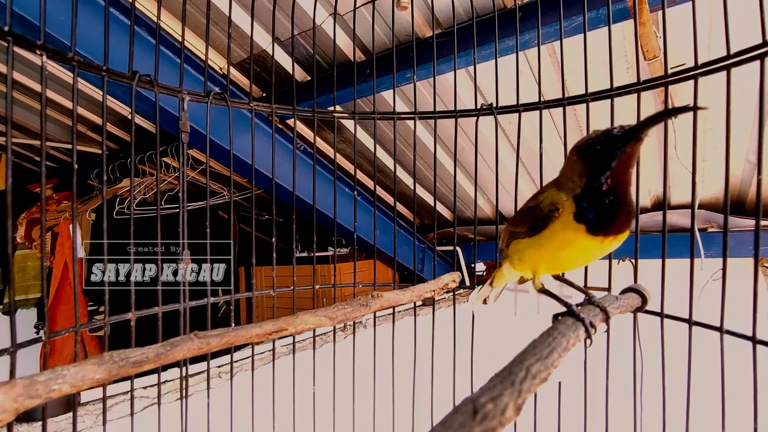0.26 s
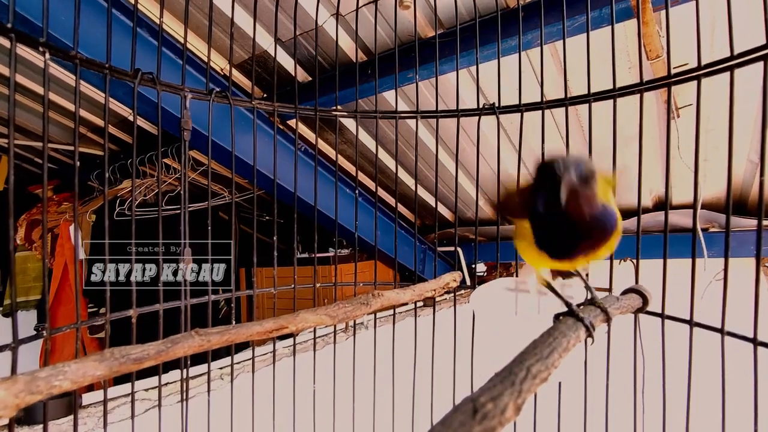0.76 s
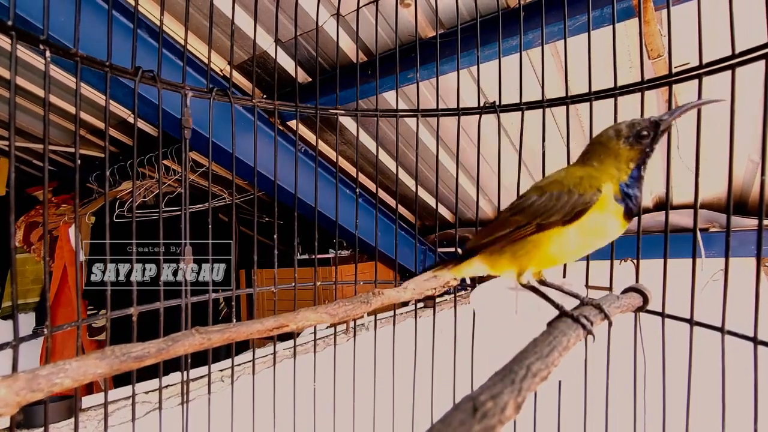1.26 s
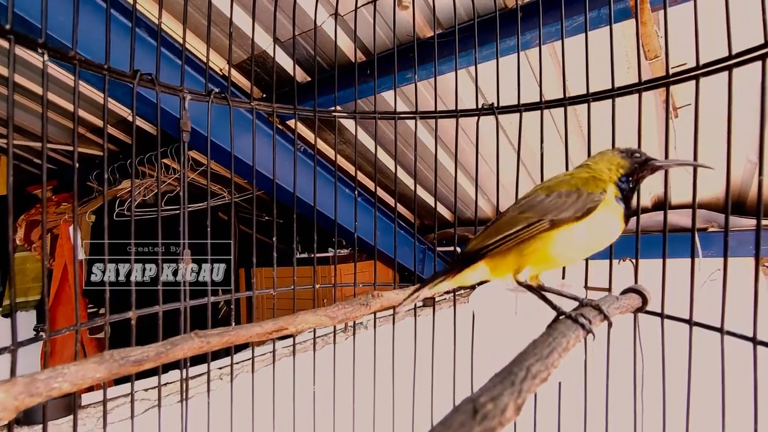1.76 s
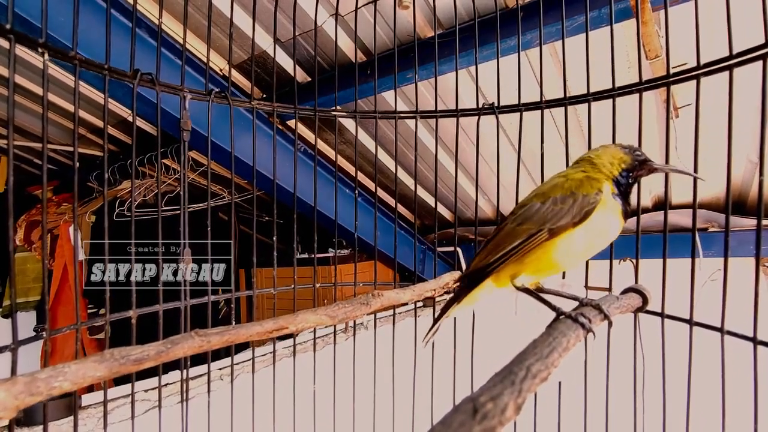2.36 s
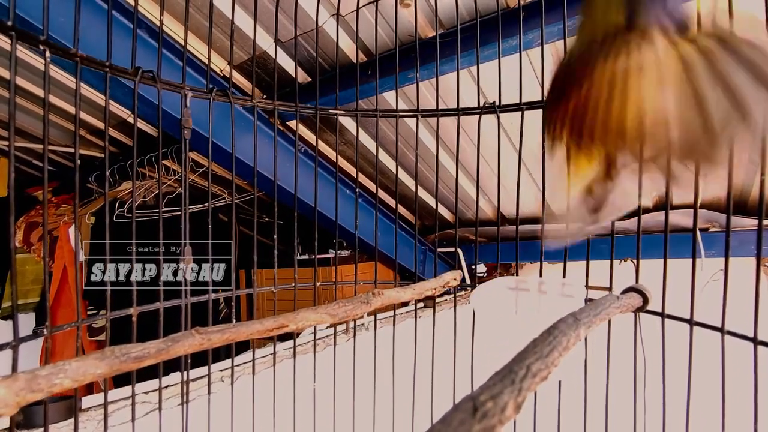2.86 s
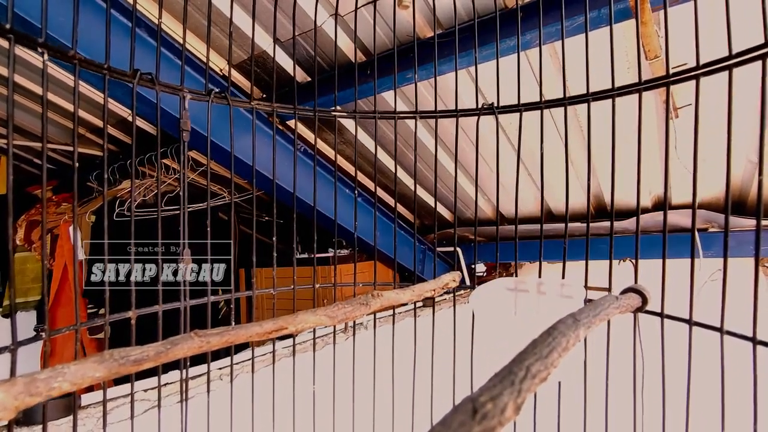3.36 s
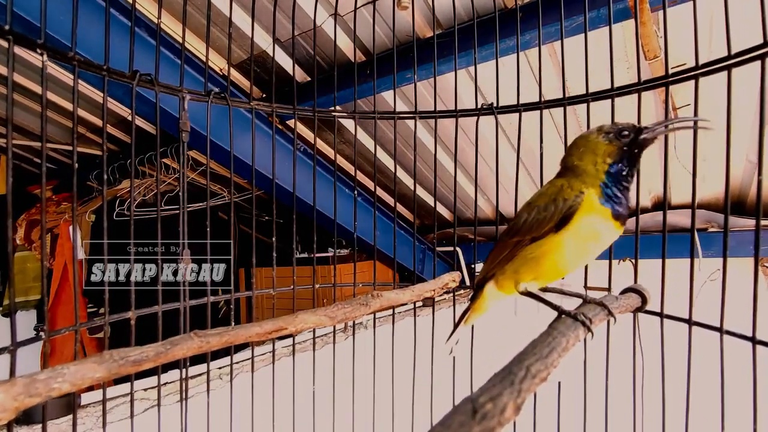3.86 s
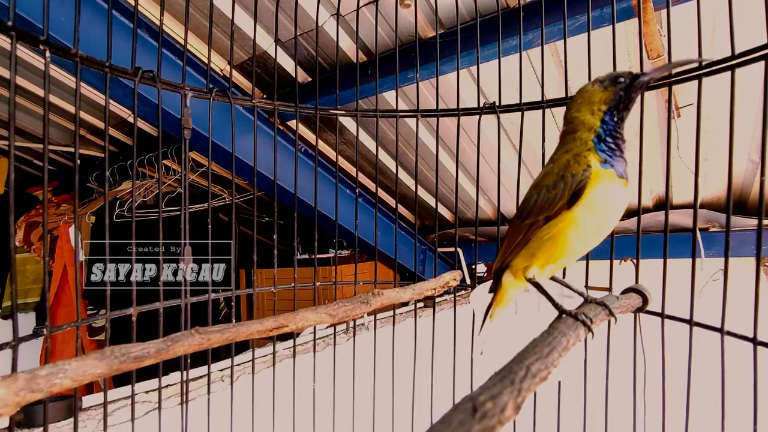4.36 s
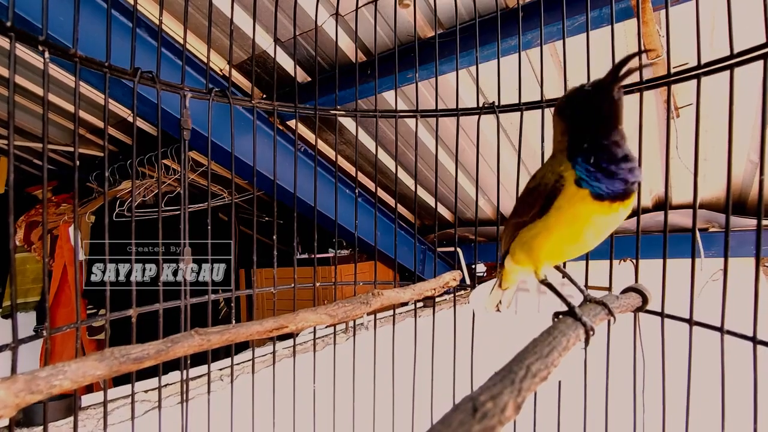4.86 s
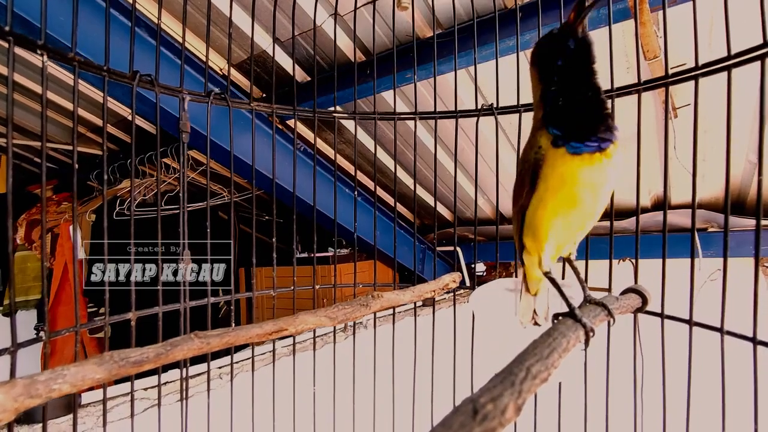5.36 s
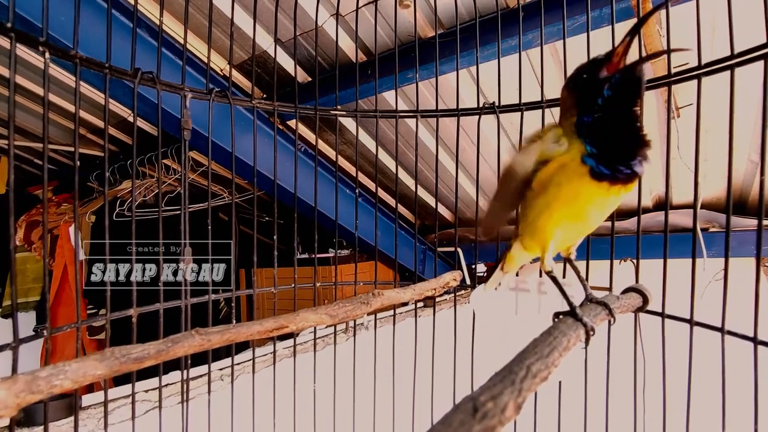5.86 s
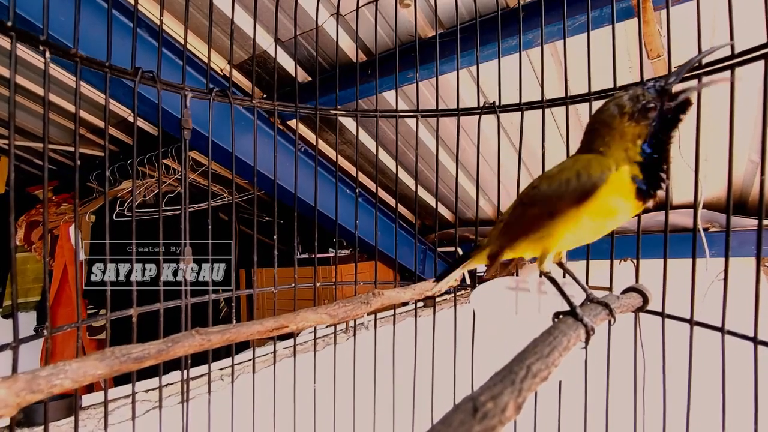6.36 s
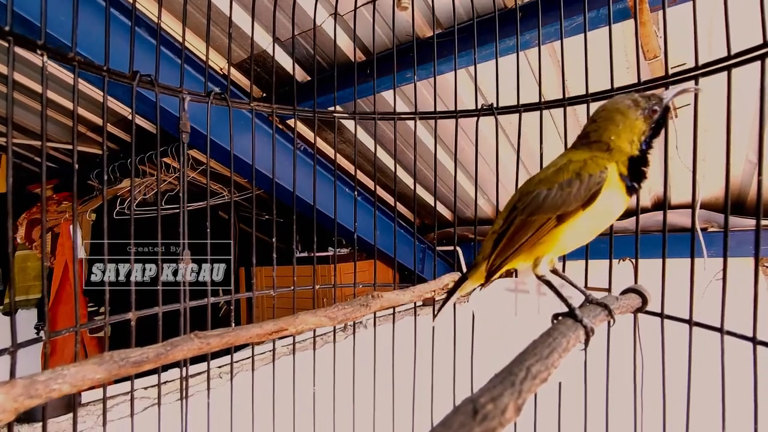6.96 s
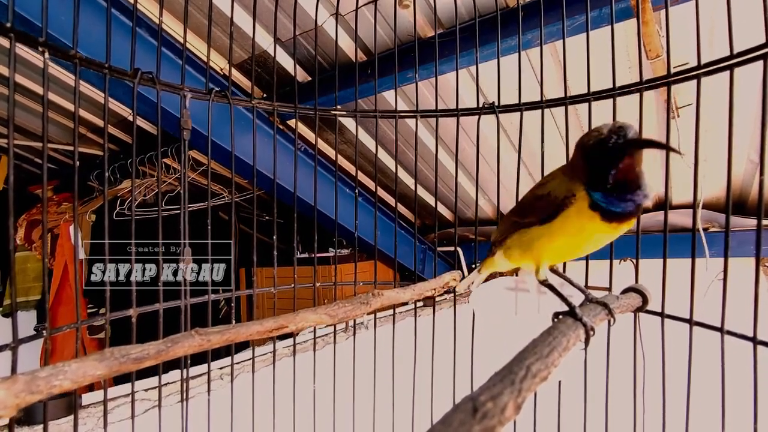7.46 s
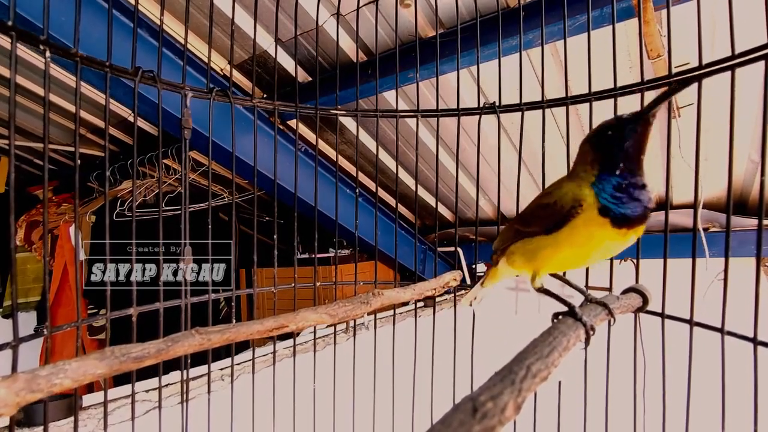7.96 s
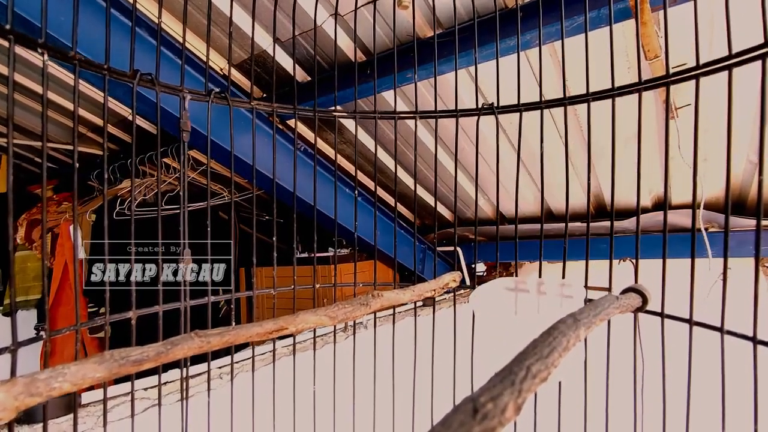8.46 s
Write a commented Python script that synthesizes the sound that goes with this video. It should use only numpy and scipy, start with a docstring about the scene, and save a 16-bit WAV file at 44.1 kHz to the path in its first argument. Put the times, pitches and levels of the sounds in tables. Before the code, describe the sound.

Quiet street rumble and faint hums under a metal roof. From 0 to 0.6 s a far bird repeats about six harsh, grainy calls with small upward slurs, then two faint whistles near 1 s. Tiny foot and feather rustles. At 2.2 s the background lifts and a low air puff hits the microphone, mostly right. The close caged bird gives a short chirp at 2.3 s, a rising call at 2.7, a hoarse bark at 3.0. From 3.4 to 5.6 s it pours out a fast, piercing run: quick sweeps, then seven high whistles slurring into lower raspy snarls, linked by jagged zigzags, with a short bright echo. A motor swells from 4.8 s, passes near 5.9 with road noise, sinks in pitch and fades by 7.2. At 7.35 s a heavy puff thumps right, a sharp chip follows at 7.4, a faint far call at 7.9, then quiet hum.

```python
"""Caged sunbird under a metal roof

A sunbird in a wire cage gives a few chirps and barks, a fast run of arched whistles, snarls and zigzags,
then a last chip: a harmonic buzz through a moving throat resonance, with echoes of filtered noise.
Shaped noise makes air puffs on the microphone, rustles and street noise; sums of sines make a passing
engine and faint hums. Another bird calls far off in noise bursts, sine slurs and whistles."""
import sys
import numpy as np
from scipy import signal
from scipy.fft import rfft, irfft, next_fast_len
from scipy.io import wavfile
from scipy.ndimage import uniform_filter1d, minimum_filter1d, map_coordinates

SR = 44100
rng = np.random.default_rng(int(sys.argv[2]) if len(sys.argv) > 2 else 0)


def dump(signal):
    """Clip the signal to [-1, 1] and save it as 16-bit WAV at the path in sys.argv[1]."""
    limited = np.clip(np.atleast_2d(signal).T, -1, 1)
    pcm = np.round(limited * 32767).astype(np.int16)
    wavfile.write(sys.argv[1], SR, pcm)


N = 384552
T = np.arange(N) / SR  # seconds
HZ = np.maximum(np.fft.rfftfreq(N, 1 / SR), 1)


def from_db(db):
    """Decibels to gain."""
    return 10 ** (np.asarray(db) / 20)


def rms_one(x):
    """Scale to unit power."""
    return x / np.sqrt(np.mean(x ** 2) + 1e-20)


def in_time(rows, t=T):
    """The columns of a curve at times t."""
    s, *columns = np.transpose(rows)
    return [np.interp(t, np.sort(s), column) for column in columns]


def at_hz(points, hz):
    """Read a spectrum on a log-frequency axis."""
    f, value = np.transpose(points)
    return np.interp(np.log(hz), np.log(f), value)


def coloured(x, points, unit=1):
    """Filter by a spectrum whose frequencies count in the given unit."""
    size = next_fast_len(x.shape[-1])
    hz = np.maximum(np.fft.rfftfreq(size, 1 / SR), 1)
    gain = from_db(at_hz(points, hz / unit))
    return irfft(rfft(x, size) * gain, size)[..., :x.shape[-1]]


def wander(rate, t=T):
    """Smooth chance with a spread near 1, renewed rate times a second."""
    knots = rng.standard_normal(4096)
    return np.interp((t - t[0]) * rate, np.arange(len(knots)), knots)


def swell(s, db, half, t=T):
    """A bell-shaped burst of level."""
    return from_db(db) * np.exp(-np.minimum(((t - s) / half) ** 2, 50) / 2)


def delayed(x, ms):
    """Read a signal a little later, or earlier if ms is negative."""
    return map_coordinates(x, [np.arange(N) - ms * SR / 1000], order=3, mode="nearest")


def panned(pair, points):
    """Share each frequency between the sides by its left-right dB."""
    ratio = from_db(at_hz(points, HZ))
    sides = np.array([ratio, np.ones_like(ratio)]) * np.sqrt(2 / (1 + ratio ** 2))
    return irfft(rfft(pair) * sides, N)


def echoes(x, t60, colour, gap_s):
    """Dense reflections that start after a gap and die away, different on each side."""
    t = np.arange(SR) / SR
    response = coloured(rng.standard_normal((2, len(t))), colour)
    response *= from_db(-60 * t / t60) * (t > gap_s)
    response /= np.sqrt(np.sum(response ** 2, axis=1, keepdims=True))
    return signal.fftconvolve(x[None], response, axes=1)[:, :N]


# How alike the two sides are. Each row: frequency in Hz, left-right correlation.
LIKENESS = [(50, 0.98), (300, 0.94), (700, 0.85), (1500, 0.2), (4000, 0.089), (12000, 0.036)]
STREET_LAG_MS = 0.38  # the left side hears the street later


def far_noise(spectrum):
    """Stereo noise from the street side: alike in the bass, diffuse in the treble."""
    mid, side = rfft(rng.standard_normal((2, N))) * from_db(at_hz(spectrum, HZ))
    alike = np.clip(at_hz(LIKENESS, HZ), 0, 1)
    mid, side = mid * np.sqrt(1 + alike), side * np.sqrt(1 - alike)
    lag = np.exp(-2j * np.pi * HZ * STREET_LAG_MS / 1000)
    return rms_one(irfft([(mid + side) * lag, mid - side], N))


SLUR_HZ, SLUR_RISE_HZ_PER_S, SLUR_HALF_S = 4200, 11000, 0.013


def far_slur(s, db, blur_hz=70, root_db=1):
    """A short upward slur of the far bird, with the octave below it."""
    from_middle = np.clip(T - s, -3 * SLUR_HALF_S, 3 * SLUR_HALF_S)
    hz = SLUR_HZ + SLUR_RISE_HZ_PER_S * from_middle + blur_hz * wander(400)
    root_phase = np.pi * np.cumsum(hz) / SR
    return swell(s, db, SLUR_HALF_S) * (from_db(root_db) * np.sin(root_phase) + np.sin(2 * root_phase))


# The far bird's harsh calls. Each row: start in seconds, level in dB.
FAR_CALLS = [(-.012, -49.5), (.103, -52), (.208, -51), (.318, -48), (.433, -47), (.540, -48),
             (7.925, -53.5)]
# Its upward slurs, around the onsets of harsh calls. Each row: middle in seconds, level in dB.
FAR_SLURS = [(.105, -65), (.21, -61), (.322, -58), (0.435, -60)]
# Its whistles. Each row: middle in seconds, level in dB, half length in seconds, pitch in Hz.
FAR_WHISTLES = [(1.003, -60.5, 0.022, 2900), (1.073, -59, .018, 2500)]
# Tone of the harsh calls. Each row: frequency in Hz, relative level in dB.
FAR_COLOUR = [(1700, -23), (2250, 10), (3100, 6), (3700, -17), (4300, -3.5), (5200, -20)]
# Tone of the far bird's echo and the sunbird's early echo. Each row: frequency in Hz, relative level in dB.
ROOM_COLOUR = [(1000, -2.5), (4000, 2), (6800, -4), (8500, 10), (12000, -1.5), (16000, 1.5)]
FAR_T60_S = 0.95


def far_bird(attack_s=0.013, release_s=0.036, echo_db=-7, grain_db=2, blur_hz=130, whistle_echo_db=1):
    """Grainy noise calls with a slow echo tail, and blurred sine slurs and whistles with echoes."""
    calls = 0
    for s, db in FAR_CALLS:
        age = np.maximum(T - s, 0)
        body = np.exp(-age / release_s) * from_db(grain_db * wander(200))
        tail = from_db(echo_db - 60 * age / FAR_T60_S)
        call = from_db(db) * np.minimum(age / attack_s, 1) * np.hypot(body, tail)
        calls = np.hypot(calls, call)
    tones = sum(far_slur(*row) for row in FAR_SLURS)
    for s, db, half, hz in FAR_WHISTLES:
        phase = 2 * np.pi * np.cumsum(hz + blur_hz * wander(660)) / SR
        tones = tones + swell(s, db, half) * np.sin(phase)
    echo = from_db(whistle_echo_db) * echoes(tones, FAR_T60_S, ROOM_COLOUR, gap_s=.02)
    return far_noise(FAR_COLOUR) * calls + tones + echo


# Passing engine. Each row: time in seconds, firings per second.
FIRING = [(0, 46), (4.6, 45.8), (5.1, 46.2), (5.55, 46.7), (5.85, 45.1), (6.3, 44.3), (7.3, 43.6),
          (8.72, 42.3)]
# Its loudness. Each row: time in seconds, level in dB.
ENGINE = [(0, -58), (2.1, -58), (2.3, -53.5), (4.0, -52), (4.8, -39.5), (5.4, -36.5), (5.8, -37.5),
          (6.2, -35.5), (6.7, -37.5), (7.2, -49.5), (8.72, -54.5)]
# Its balance coming and going. Each row: order as a multiple of the firing rate, relative level in dB.
ORDERS_AHEAD = [(1, -21), (2, -5), (3, -4.5), (4, 1.5), (5, 1), (6, -20), (7, -11.5), (8, -11.5), (9, -3),
                (10, -5.5)]
ORDERS_BEHIND = [(1, -26), (2, -15), (3, -14.5), (4, -3), (5, 1), (6, -4), (7, -2), (8, -7), (9, -9.5),
                 (10, -8)]
# The balance turns from coming to going: start in seconds, end in seconds.
TURN_S = (5.5, 5.9)


def engine(waver_db=2.5, unsteady=0.0048):
    """Exhaust orders sink in pitch and change their balance as the engine goes by."""
    (firing,), (level_db,) = in_time(FIRING), in_time(ENGINE)
    phase = 2 * np.pi * np.cumsum(firing * (1 + unsteady * wander(12))) / SR
    past, out = np.interp(T, TURN_S, (0, 1)), 0
    for k, (ahead, behind) in enumerate(zip(ORDERS_AHEAD, ORDERS_BEHIND), 1):
        order_db = ahead[1] + past * (behind[1] - ahead[1]) + waver_db * wander(6)
        out = out + from_db(order_db) * np.sin(k * phase + 2 * np.pi * rng.random())
    out = rms_one(out) * from_db(level_db)
    return np.array([delayed(out, STREET_LAG_MS), out])


# Faint hums and a thin whine. Each row: start in seconds, end in seconds, pitch in Hz, level in dB,
# spread of the pitch in Hz.
HUMS = [(0, 2.2, 183, -59.5, 3.7), (0, 2.2, 332.8, -60, 3), (0, 3.8, 114, -59, 4),
        (2.2, 3.3, 355.5, -58, 1.5), (2.4, 4.2, 414.5, -55, .8), (2.2, 8.5, 94, -56, 8),
        (5.3, 5.75, 91, -47, 3), (7.5, 8.5, 99.5, -52, 1.16), (0, 2.15, 12950, -74, 60)]


def hums(fade_s=0.086, waver_db=2.5):
    """Narrow tones that waver in pitch and level, and come and go."""
    out = 0
    for start, end, hz, db, width in HUMS:
        gate = np.clip(np.minimum(T - start, end - T) / fade_s + .5, 0, 1)
        level = from_db(db + waver_db * wander(7)) * np.sqrt(2)
        phase = 2 * np.pi * np.cumsum(hz + width * wander(4 * width)) / SR
        out = out + gate * level * np.sin(phase)
    return out


# the traffic is nearest at this moment, and this long on its way in and out
NEAREST_S, APPROACH_S, RECEDE_S = 5.917, 0.84, 0.73
# the background jumps up at one moment and settles again; it also starts a little raised
SURGE_S, SURGE_SETTLE_S, OPENING_SETTLE_S = 2.155, 0.61, 0.38


def street_level(before_db, after_db, nearest_db, loss_db, surge_db, opening_db):
    """Gain of one street layer: a steady bed, the passing traffic and two swells that settle."""
    distance = np.hypot(1, (T - NEAREST_S) / np.where(T < NEAREST_S, APPROACH_S, RECEDE_S))
    passing = from_db(nearest_db - loss_db * np.log10(distance))
    bed = from_db(np.where(T < SURGE_S, before_db, after_db))
    surge = from_db(surge_db) * (T > SURGE_S) * np.exp(-np.abs(T - SURGE_S) / SURGE_SETTLE_S)
    opening = from_db(opening_db) * np.exp(-T / OPENING_SETTLE_S)
    return np.sqrt(bed ** 2 + passing ** 2 + surge ** 2 + opening ** 2)


# Rumble, road noise and hiss, in that order. Each row: steady level in dB before the surge, steady level
# in dB after it, level in dB at the nearest, loss in dB per tenfold distance, surge in dB, opening in dB.
STREET = [(-53.5, -51, -40, 26.5, -43, -47.5), (-62.5, -58, -37.5, 41.5, -46, -53),
          (-65, -66, -47.5, 49.5, -52, -60)]
# Tones of the three layers. Each row: frequency in Hz, relative level in dB.
RUMBLE = [(20, -32), (50, -25.5), (90, 0), (170, -0.5), (330, -1.5), (480, -5), (700, -6.5), (1100, -35),
          (12000, -36.5), (16000, -51.5)]
ROAD = [(400, -34.5), (750, -1), (1100, -1), (1700, -5), (2600, -12.5), (4000, -16.5), (6000, -30),
        (16000, -51)]
HISS = [(1800, -18), (3500, 2), (5500, -2), (7400, -6.5), (9100, 3.5), (10500, -10.5), (12000, 1),
        (14000, -15.5), (16000, -17.5)]
# Diffuse treble wash of the song's echo swells during the run: middle in seconds, level in dB, half length
# in seconds.
ECHO_WASH = (4.3, -48.5, .45)
# Ticks and rustles of feet and feathers. Each row: middle in seconds, level in dB, half length in seconds.
RUSTLES = [(0.232, -53, 0.019), (0.657, -58.5, 0.034), (1.698, -55.5, 0.021), (1.782, -58.5, 0.079),
           (2.21, -60.5, 0.031), (2.42, -56, 0.056), (3.037, -41, 0.0018), (6.716, -48.5, 0.011),
           (7.305, -49, 0.014), (7.329, -46.5, 0.0034), (7.344, -48, 0.0017), (7.606, -52, 0.03),
           (7.985, -57.5, 0.023)]
# Tone of the rustles. Each row: frequency in Hz, relative level in dB.
RUSTLE_COLOUR = [(800, 0.5), (2500, -6), (5000, -9), (7500, -10.5), (9200, -2), (12000, -6), (16000, -23.5)]
# Stereo balance of all these layers. Each row: frequency in Hz, left-right balance in dB.
STREET_PAN = [(100, 1), (2400, -1), (4400, -1.5), (8500, -12.5), (12000, 5.5), (15000, 1)]


def surroundings(waver_db=1):
    """Filtered noise for the street, the diffuse treble wash of the song's echo and rustles in the cage."""
    out = swell(*ECHO_WASH) * far_noise(HISS)  # the wash shares the tone of the street's treble
    for row, colour in zip(STREET, (RUMBLE, ROAD, HISS)):
        level = street_level(*row) * from_db(waver_db * wander(14))
        out += level * far_noise(colour)
    out += far_noise(RUSTLE_COLOUR) * sum(swell(*row) for row in RUSTLES)
    return panned(out, STREET_PAN)


# Puffs of air on the microphone. Each row: middle in seconds, level in dB on the right, half length in
# seconds, left-right balance in dB, pitch as a multiple of the usual colour.
PUFFS = [(2.24, -33, 0.026, -2, .8), (2.265, -15, 0.0041, -32, 1.1), (2.287, -25.5, 0.028, -17, .85),
         (7.345, -5.5, 0.0053, -38, 1.15), (7.349, -23.5, 0.022, -12, 1), (7.401, -34, 0.0028, -10, 1.1)]
# Tone of a puff. Each row: frequency in Hz, relative level in dB.
PUFF_COLOUR = [(25, -24), (70, -0.5), (160, 4.5), (330, 1.5), (560, -7.5), (800, -23), (1300, -38.5),
               (3000, -57), (9000, -97)]


def puffs():
    """Short gusts of low noise: air buffets mostly the right microphone port."""
    out = np.zeros((2, N))
    for s, db, half, pan, pitch in PUFFS:
        at = np.arange(8192) + int(s * SR) - 4096
        shape = swell(s, db, half)[at]
        eddies = coloured(shape * rng.standard_normal((2, len(at))), PUFF_COLOUR, pitch)
        # the filter must not change the level
        eddies *= np.linalg.norm(shape) / np.linalg.norm(eddies, axis=1, keepdims=True)
        out[:, at] += eddies * from_db([[pan], [0]])
    return out


# Skirt of the throat resonance. Each row: frequency as a multiple of its tuning, gain in dB.
THROAT = [(0.202, -28.5), (.35, -20), (.5, -24), (.68, -11), (.85, -5.5), (1, 4.5), (1.2, -3.5), (1.5, -16),
          (2, -16.5), (2.999, -21.5)]
# Colour of the open beak. Each row: frequency in Hz, gain in dB.
BEAK = [(1000, 5.5), (3000, 5.5), (4200, -3), (6800, 2), (7700, -9), (9000, 1.5), (10200, 1.5),
        (11700, 6.5), (13300, 5), (16000, 0)]
# Moments when the fundamental breaks through. Each row: middle in seconds, boost in dB before its flicker,
# half length in seconds.
DEEP_MOMENTS = [(4.268, 8.995, 0.006)]
# harsh notes pulse near this rate, this deeply at full rasp
RATTLE_HZ, RATTLE_DEPTH = 175, .55
# a falling note turns purer: its high overtones lose up to this much, in full at this speed of fall
FALL_LOSS_DB, FALL_OCTAVES_PER_S = 11, 9


def note(rows, odd_db, jitter_rate=2200, bright_db=8, tuning_db=-1, waver_db=4, waver_rate=90,
         clean_root_db=-12, odd_lift_db=11, clean_top_db=-12, weak_db=-3, patchy_db=5, hoarse_db=-3,
         fade_s=0.00033, flutter_db=2.5, flutter_rate=140, wobble=0.014):
    """The syrinx gives a harmonic buzz, unsteady when forced; the throat picks the harmonic near its tuning."""
    times = np.array(rows)[:, 0]
    at = np.arange(int(times.min() * SR), int(times.max() * SR))
    t = at / SR
    pitch, tuning, _, rasp, treble_db = in_time(rows, t)
    rasp = np.clip(rasp, 0, 1)
    fall_speed = uniform_filter1d(-np.gradient(np.log2(pitch)) * SR, size=180)
    falling = np.clip(fall_speed / FALL_OCTAVES_PER_S, 0, 1)
    pitch = pitch * (1 + wobble * rasp * wander(flutter_rate, t))
    jitter = .06 * (.03 + rasp ** 2) * wander(jitter_rate, t)
    phase = 2 * np.pi * np.cumsum(pitch * (1 + jitter)) / SR

    # the fundamental leaks out unevenly, more in harsh notes
    root = (from_db(clean_root_db) + rasp) * from_db(weak_db + patchy_db * wander(waver_rate, t))
    root = root + sum(swell(*row, t) for row in DEEP_MOMENTS)
    root = root * (.7 + .45 * wander(700, t))
    # as the throat nears the third harmonic, the second turns weak and patchy
    on_third = np.clip(tuning / pitch - 2, 0, 1)
    second = from_db(on_third * (weak_db + patchy_db * wander(waver_rate, t)))
    # the kind of note sets its odd harmonics, except on the third, where clean notes lift the odd overtones
    kept = from_db(odd_db * (1 - on_third))
    lift = from_db(odd_lift_db * np.maximum(1 - 2 * rasp, 0) * on_third)
    odd = lift * kept * from_db(-FALL_LOSS_DB / 2 * falling * (1 - on_third))
    # the purest notes lose their high overtones, which also come and go
    top = from_db(clean_top_db * np.maximum(1 - rasp / .25, 0) - FALL_LOSS_DB * falling)
    buzz = kept * root * np.sin(phase) + second * np.sin(2 * phase) + odd * np.sin(3 * phase)
    for k in range(4, 10):
        overtone = top * odd ** (k % 2) * np.sin(k * phase) * (k * pitch < SR / 2)
        buzz += overtone * from_db(waver_db * wander(waver_rate, t))

    source = buzz * (1 + .5 * rasp * wander(jitter_rate, t))
    # turbulence grows with rasp and drowns the buzz in the harshest moments
    turbulence = np.resize(rng.standard_normal(16384), len(t))
    source = source * (1 - .7 * rasp ** 4) + 1.7 * rasp ** 2.1 * turbulence
    # the moving throat: a blend of neighbouring fixed tunings
    tunings = np.geomspace(3400, 7600, 12)
    voice = 0
    for hz, share in zip(tunings, np.eye(len(tunings))):
        voice = voice + np.interp(tuning, tunings, share) * coloured(source, THROAT, hz)
    # forced notes are brighter, and a wide gape lets the raw buzz past the resonance
    treble = signal.sosfiltfilt(signal.butter(3, 8000, "high", fs=SR, output="sos"), voice)
    raw = signal.sosfiltfilt(signal.butter(2, [3600, 7000], "band", fs=SR, output="sos"), source)
    voice = voice + treble * (from_db(tuning_db + treble_db + bright_db * rasp) - 1)
    voice = coloured(voice + from_db(hoarse_db) * rasp ** 3 * raw, BEAK)
    # even out the level, so that the note's own curve sets it
    voice /= np.sqrt(uniform_filter1d(voice ** 2, size=150) + 1e-9)

    # harsh notes rattle, and raspy ones flutter in level
    rattle_phase = 2 * np.pi * np.cumsum(RATTLE_HZ * (1 + .1 * wander(waver_rate, t))) / SR
    voice *= 1 + RATTLE_DEPTH * rasp * np.sin(rattle_phase)
    voice *= from_db(flutter_db * rasp * wander(flutter_rate, t))
    voice *= np.minimum((t[-1] - t) / fade_s, 1)
    return at, voice * np.interp(t, np.sort(times), from_db(np.array(rows)[:, 3]))


def shaped(shape, row):
    """Stretch a shape to one note: rows of (s, pitch Hz, throat tuning Hz, level dB, rasp, treble dB)."""
    start, before, after, hz, opening_db, closing_db, added_rasp, treble_db = row
    stage, share, harmonic, db, rasp = np.transpose(shape)
    times = start + before * np.minimum(stage, 1) + after * np.maximum(stage - 1, 0)
    level = db + opening_db + (closing_db - opening_db) * stage / 2
    treble = np.full(len(stage), treble_db)
    return np.transpose([times, hz * share, hz * share * harmonic, level, rasp + added_rasp, treble])


# Every shape below. Each row: stage from 0 (start) through 1 (the turn) to 2 (end), pitch as a share of the
# note's, harmonic that the throat is tuned to, level in dB relative to the note's, rasp before the note's own.
# Every list of notes below. Each row: start in seconds, time to the turn in seconds, time after it in seconds,
# pitch in Hz, opening level in dB, closing level in dB (both added to the shape's), rasp added to the
# shape's, treble lift in dB beside that of rasp.
# chirp: a soft little arch, a dip at the turn, then two clean leaps, the second held; it opens the song
CHIRP = [(0, .62, 2, -34, .6), (.45, .8, 2, -15, .4), (1, .67, 2, -11, .2), (1.15, .97, 2, -2, .08),
         (1.25, .95, 2, 1, .08), (1.37, .86, 2, -1, .22), (1.5, 1, 2, 4.5, .04), (1.7, .96, 2, 0, .05),
         (1.92, 1.03, 2, -7, .14), (2, 1.02, 2, -13, .14)]
CHIRPS = [(2.2731, .006, .031, 3152, -20.5, -9, 0.034, 5.4)]
# rising call: climbs in three steps out of a rasp; one follows the chirp
RISE = [(0, .4, 2.6, -24, .9), (.25, .55, 2.2, -17, .8), (.55, .6, 2, -14, .7), (.7, .71, 2, -7, .48),
        (1, .67, 2, -6, .48), (1.17, .95, 2, 2, .4), (1.35, .86, 2, 2, .5), (1.55, 1.02, 2, -3, .3),
        (1.85, .92, 2, -3, .35), (2, .9, 2, -12, .45)]
RISES = [(2.698, .017, 0.03, 2975, -16.5, -12, 0.028, 1)]
# bark: one short, hoarse arch, alone or as the hoarse start of a sweep or arch
BARK = [(0, .72, 2.1, -21, 1), (.35, .88, 1.9, -6, .95), (.88, .95, 1.9, -2, .9), (1, 1, 2, 0, .68),
        (1.28, .9, 2, 0, .72), (1.48, .76, 2.1, -1, .82), (1.82, .72, 2.1, -4, .85),
        (2, .62, 2.4, -15, .95)]
BARKS = [(3.039, 0.03, 0.04, 2942, -18.5, -17.5, .03, -4), (3.404, 0.018, .024, 2440, -26, -27.5, 0.36, 1),
         (3.537, 0.0072, 0.049, 2864, -16.5, -29, 0.42, -4.5),
         (4.728, 0.015, .006, 3400, -19.5, -13, 0.29, 2)]
# sweep: a long rise from the third harmonic to the second, then two quick arches; two open the run
SWEEP = [(0, .56, 2.9, -17, .9), (.15, .6, 2.7, -13, .8), (.28, .65, 2.6, -2, .45),
         (.55, .73, 2.4, -1, .22), (.78, .84, 2.1, -2, .22), (.97, 1.02, 2, 1, .25), (1.04, .8, 2, -6, .75),
         (1.24, .98, 2, -1, .4), (1.43, .75, 2.1, -5, .7), (1.53, 1.01, 2, 2, .35), (1.76, .84, 2, -1, .45),
         (2, .62, 2.3, -16, .8)]
SWEEPS = [(3.434, .0275, 0.029, 3197, -10, -10, 0.033, 2.3), (3.571, 0.019, 0.037, 3066, -9, -13, .03, 3.6)]
# whistle: leaps up, holds, and slides down after the turn
WHISTLE = [(0, .7, 2.6, -24, 0.7), (.14, .82, 2.1, -10, 0.7), (.24, 0.98, 2, 1.5, 0),
           (.6, 1, 2, -1.5, 0.27), (1, .94, 2, -1.5, .06), (1.55, .81, 2, 0.5, 0.2),
           (2, .67, 2.3, -10, 0.06)]
WHISTLES = [(3.668, .052, 0.028, 2765, -8.5, -10, 0.034, 0.5),
            (3.955, 0.038, 0.027, 2772, -10, -9, 0.05, 5), (4.225, 0.046, 0.029, 2739, -9, -13, 0.17, 0.5),
            (4.523, 0.049, 0.033, 2790, -6.5, -15, -0.064, 1),
            (4.825, .043, 0.038, 2741, -12.5, -10, 0.023, -5),
            (5.124, 0.051, 0.03, 2684, -10.5, -10, 0.12, -4.5),
            (5.457, 0.038, 0.027, 2807, -10, -8, 0.023, -2.5)]
# snarl: a lower, raspy arch near the third harmonic, highest at the turn; each whistle runs on into one
SNARL = [(0, .77, 2.9, -8, 0.64), (.35, .82, 2.9, -4.5, .6), (.65, .94, 3, 1, 0.54),
         (1, 0.98, 2.6, 3, 0.42), (1.5, .95, 2.95, -1.5, .45), (2, .69, 3.5, -18.5, 0.97)]
SNARLS = [(3.757, 0.048, 0.032, 2344, -9.5, -9.5, -0.14, -3.5),
          (4.028, 0.046, 0.036, 2298, -10, -10, -0.065, -4.5),
          (4.303, 0.062, 0.047, 2356, -11.5, -20.5, 0.23, -3),
          (4.616, 0.035, 0.035, 2326, -16.5, -9, 0.24, 3),
          (4.913, .057, .026, 2362, -11.5, -12, -0.16, -3.5),
          (5.217, 0.055, 0.034, 2341, -13.5, -13, -0.027, 1),
          (5.543, 0.058, 0.024, 2342, -17, -7, 0.033, -3.5)]
# zigzag: flicks up twice, breaks at the turn to a low arch, breaks up again and dives; links the whistles
ZIGZAG = [(0, .62, 2.6, -20, .95), (.35, .74, 2.3, -7, .75), (.74, .96, 2, -3, .55), (.8, .85, 2, -4, .7),
          (.98, 1.05, 2, 3, .3), (1.02, .68, 2.2, -9, .7), (1.15, .8, 2, -2, .35), (1.26, .76, 2, -3, .35),
          (1.38, .6, 2.3, -7, .55), (1.41, 1, 2, -9, .6), (1.45, .98, 2, 4, .25), (1.72, .78, 2, -1, .35),
          (2, .6, 2.3, -14, .6)]
ZIGZAGS = [(3.85, .015, 0.033, 3380, -10.5, -12, 0.14, 2.5),
           (4.121, .015, .031, 3240, -7.5, -13.5, 0.073, 2),
           (4.405, .019, 0.034, 3280, -9, -11, 0.082, 3.5), (5.013, .019, 0.025, 3250, -13, -10, .08, 1),
           (5.321, .020, 0.03, 3394, -6.5, -16.5, 0.36, 7)]
# arch: a short rise and fall, nearly clean in the middle; one takes the place of a zigzag
ARCH = [(0, .78, 2, -18, 0.83), (.35, 1, 2, 5, 0.16), (1, 0.87, 2, 4.5, 0.27), (1.45, 0.95, 2, -5.5, 0.47),
        (1.75, .74, 2, -7.5, .45), (2, 0.58, 2.2, -13.5, 1)]
ARCHES = [(4.740, .014, .021, 3370, -7.5, -11, 0.023, 0.0038)]
# chip: starts much like the chirp, but makes one high leap that drops away; it closes the song
CHIP = [(0, .57, 2, -30, .7), (.5, .83, 2, -13, .35), (.75, .79, 2, -9, .3), (1, .66, 2, -8, .45),
        (1.3, 1.03, 2, 2, .08), (1.44, .97, 2, 3, .08), (1.53, .87, 2, -4, .05), (1.8, .9, 2, -5, .05),
        (2, .93, 2, -11, .1)]
CHIPS = [(7.414, .0125, .016, 3600, -19.5, -4, 0.00098, 12.6)]
# Balance of the odd harmonics. Each entry: kind of note, level in dB while the throat is on the second.
ODD_DB = {"whistle": -3, "sweep": 0, "zigzag": -1, "arch": -2, "chirp": -24, "bark": 3}


def song():
    """All notes, each with the level of its odd harmonics; whistles slur into snarls."""
    notes = []
    for whistle, snarl in zip(WHISTLES, SNARLS):
        slurred = np.vstack([shaped(WHISTLE, whistle), shaped(SNARL, snarl)])
        notes.append((slurred, ODD_DB["whistle"]))
    kinds = ((CHIRP, CHIRPS, "chirp"), (RISE, RISES, "chirp"), (BARK, BARKS, "bark"), (SWEEP, SWEEPS, "sweep"),
             (ZIGZAG, ZIGZAGS, "zigzag"), (ARCH, ARCHES, "arch"), (CHIP, CHIPS, "chirp"))
    for shape, rows, kind in kinds:
        notes += [(shaped(shape, row), ODD_DB[kind]) for row in rows]
    return notes


# The beak's beam colours the direct sound and starves it of top treble. Each row: frequency in Hz, gain in dB.
BEAM = [(7000, -0.5), (8500, 6), (12000, -3.5), (16000, -9.5)]
# Near surfaces of the cage and roof. Each row: delay in milliseconds, level in dB.
REFLECTIONS = [(4.3, -39), (9.1, -15.5), (14.7, -22)]
# The head turns. Each row: time in seconds, milliseconds by which the left side hears the bird later.
HEAD = [(2.3, -0.04), (2.72, -0.078), (3.8, -0.065), (4.25, -0.04), (4.55, -0.043), (4.868, -0.091),
        (5.15, -0.082), (5.6, -0.079), (7.43, -0.057)]
# Tone of the late echo. Each row: frequency in Hz, relative level in dB.
TAIL_COLOUR = [(1000, 17.5), (4000, 6.5), (5500, 2), (6500, 8), (7200, -4.5), (8500, -8.5), (12000, -39.5),
               (16000, -27)]
# Stereo balance of the bird. Each row: frequency in Hz, left-right balance in dB.
BIRD_PAN = [(4000, 0), (8000, -3), (10000, -6.5), (12000, 24.5), (16000, -2)]
EARLY_DB, EARLY_T60_S, LATE_DB, LATE_T60_S = -4.5, 0.12, -24.5, 0.96


def sunbird():
    """The song reaches the microphones directly, off the near surfaces and through the shed."""
    dry = np.zeros(N)
    for rows, odd_db in song():
        at, voice = note(rows, odd_db)
        dry[at] += voice
    near = coloured(dry, BEAM)
    for ms, db in REFLECTIONS:
        near = near + from_db(db) * np.interp(T - ms / 1000, T, dry)
    direct = np.array([delayed(near, in_time(HEAD)[0]), near])
    early = from_db(EARLY_DB) * echoes(dry, EARLY_T60_S, ROOM_COLOUR, gap_s=0.00033)
    late = from_db(LATE_DB) * echoes(dry, LATE_T60_S, TAIL_COLOUR, gap_s=0.0087)
    return panned(direct + early + late, BIRD_PAN)


def scene():
    """Everything together."""
    return far_bird() + engine() + hums() + surroundings() + puffs() + sunbird()


CUTOFF_HZ = 16200


def record(dry, ceiling_db=-2.5):
    """A fast limiter holds the loudest peaks down, and a steep low-pass cuts the top."""
    gain = np.minimum(1, from_db(ceiling_db) / (np.abs(dry).max(axis=0) + 1e-9))
    gain = uniform_filter1d(minimum_filter1d(gain, size=45), size=45)
    low_pass = signal.ellip(10, .1, 80, CUTOFF_HZ, fs=SR, output="sos")
    return signal.sosfilt(low_pass, dry * gain)


dry = scene()
out = record(dry)
dump(out)
```